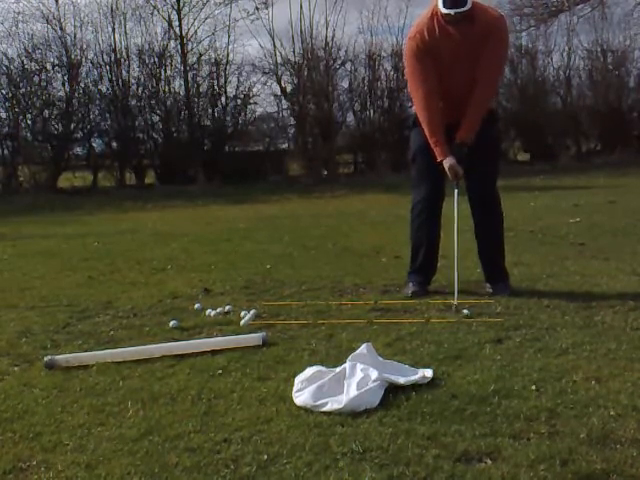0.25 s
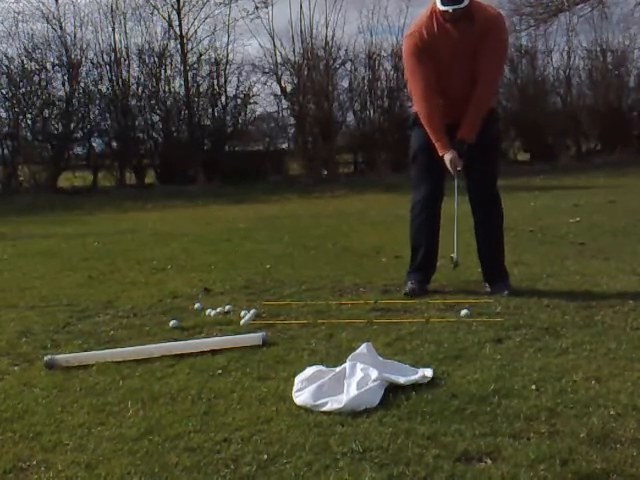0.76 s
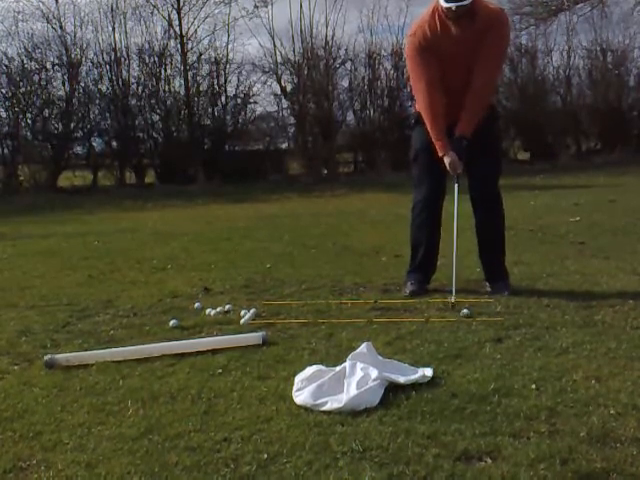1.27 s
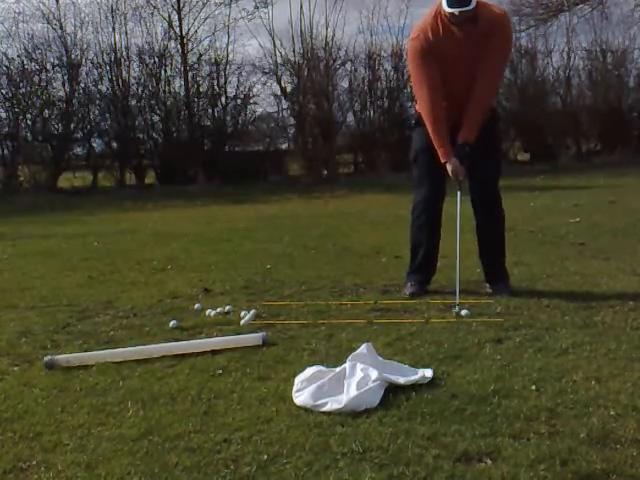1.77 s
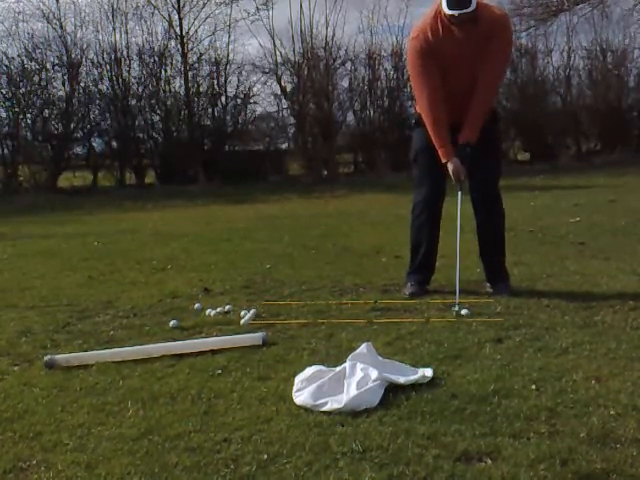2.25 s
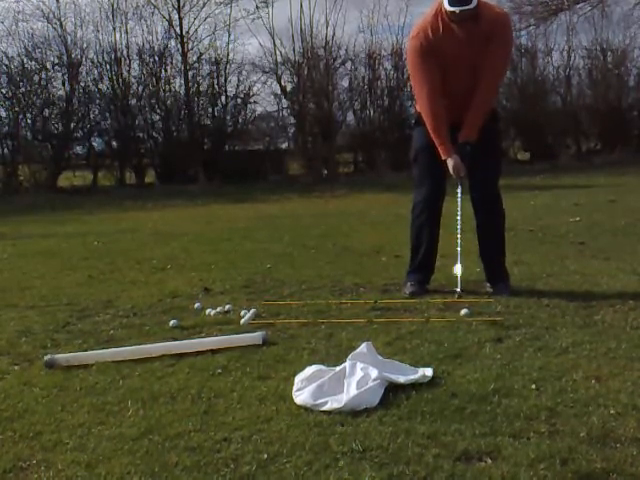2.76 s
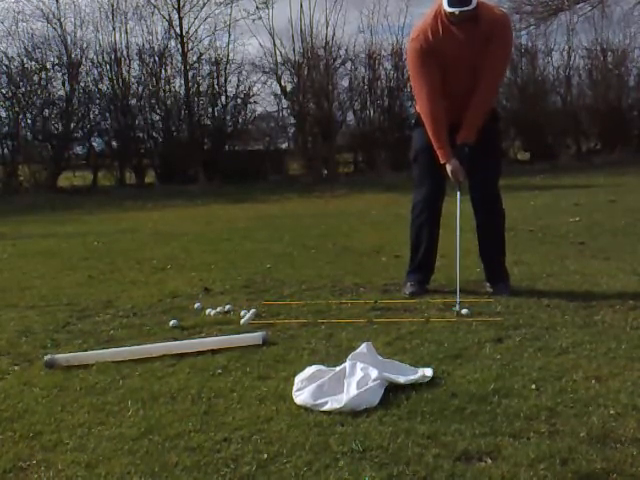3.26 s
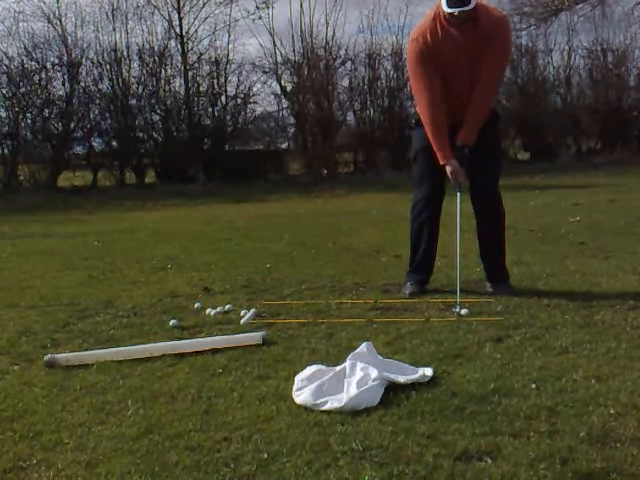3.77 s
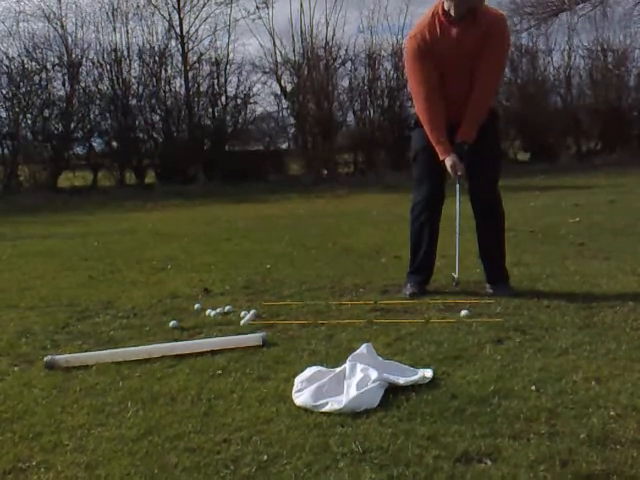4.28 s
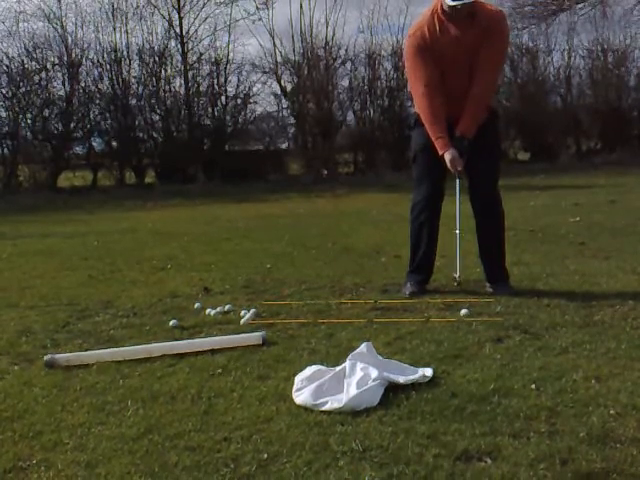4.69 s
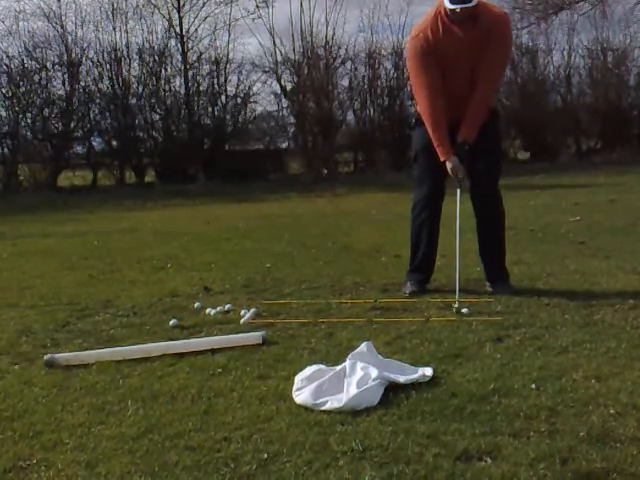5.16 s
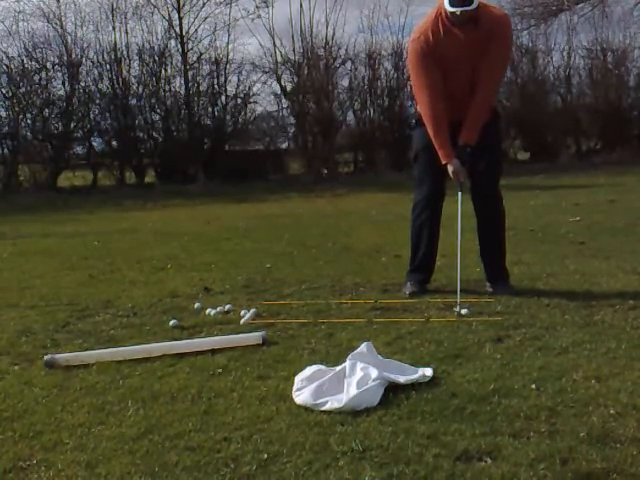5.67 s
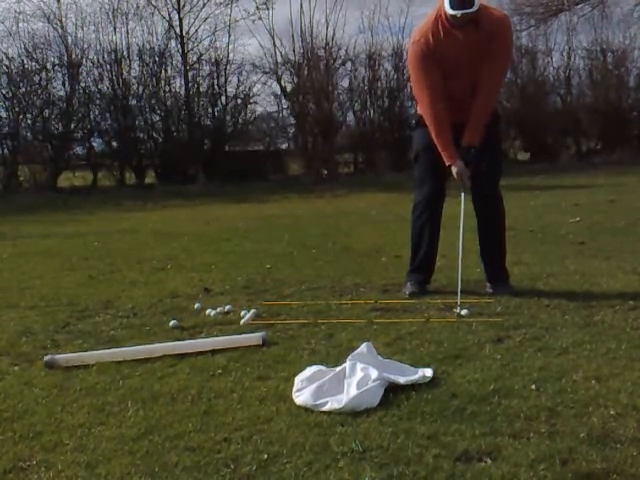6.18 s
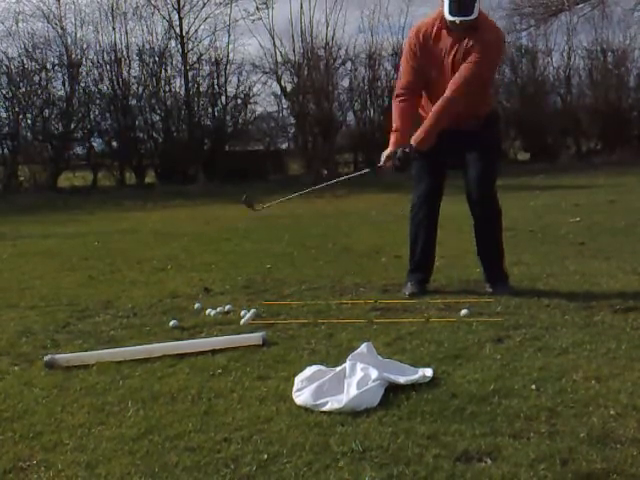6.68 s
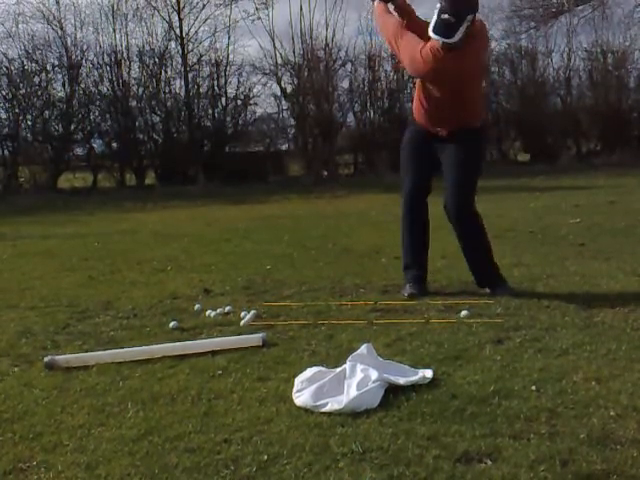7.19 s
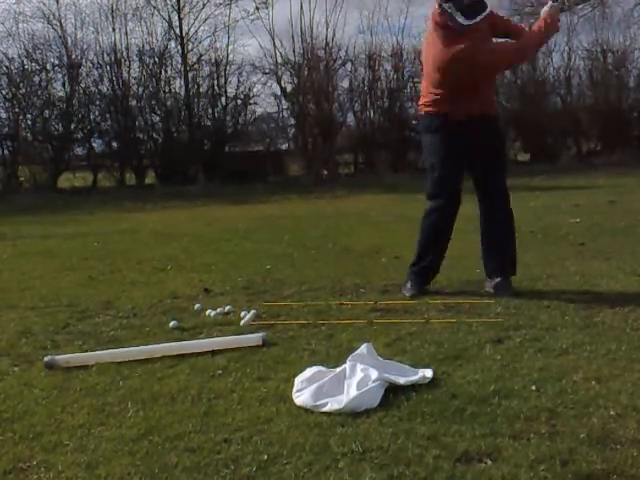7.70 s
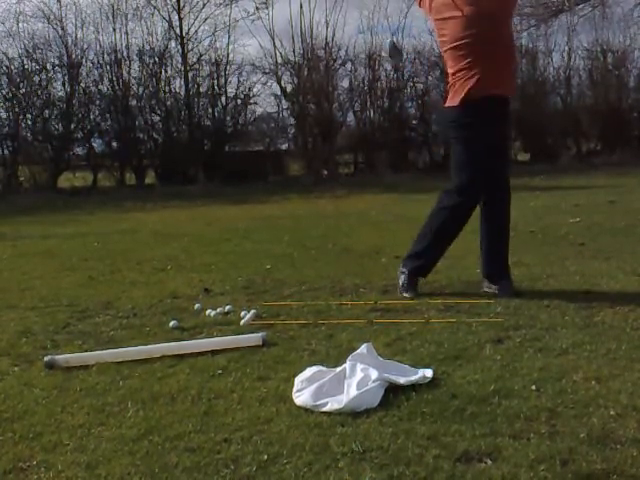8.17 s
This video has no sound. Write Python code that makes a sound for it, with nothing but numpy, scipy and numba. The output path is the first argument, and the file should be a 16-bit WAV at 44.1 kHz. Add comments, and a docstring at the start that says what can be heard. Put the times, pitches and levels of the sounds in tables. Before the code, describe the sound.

A propeller plane drones low over distant traffic outdoors, wind thuds on the microphone, then a swift whoosh and one sharp golf-ball click on turf.

```python
"""In an open field lined by a hedge, an iron strikes a golf ball off grass a few metres from the microphone.
Far traffic is coloured noise; a propeller aircraft, harmonics of a sinking firing rate with a noisy rasp.
Wind is low-passed noise with one hard buffet of separate pressure pulses; the shaft whooshes as a rising
vortex tone in a rush of air. Brief contact forces ring the modes of the head into a click; noise bursts
make the sole cutting turf and the faint, smeared echo from hedge and trees."""
import sys
import numpy as np
from scipy import signal
from scipy.fft import rfft, irfft, next_fast_len
from scipy.io import wavfile
from scipy.ndimage import uniform_filter1d
from numba import njit

SR = 44100
rng = np.random.default_rng(int(sys.argv[2]) if len(sys.argv) > 2 else 0)


def voltage_ratio(level):
    """Linear amplitude factor for a level in decibels (scalar or array-like)."""
    return 10 ** (np.asarray(level, float) / 20)


def wav_record(signal):
    """Record a signal, one row per channel, as 16-bit PCM in the file named by sys.argv[1]."""
    frames = np.transpose(np.atleast_2d(signal))
    bounded = np.clip(frames, -1, 1)
    # unit amplitude maps onto the largest positive 16-bit level
    quanta = np.round(bounded * 32767).astype(np.int16)
    wavfile.write(sys.argv[1], SR, quanta)


N = 372194
T = np.arange(N) / SR


def curve(table):
    """Linear interpolation: joins each column of a table by straight lines in time."""
    s, *columns = np.transpose(table)
    return [np.interp(T, s, c) for c in columns]


def unit(x):
    """Normalisation to an rms of 1."""
    return x / np.sqrt(np.mean(x ** 2))


def noise(colour):
    """Spectral shaping: stationary noise of rms 1 whose spectrum follows f/Hz, level/dB."""
    hz, db = np.transpose(colour)
    size = next_fast_len(N)
    f = np.arange(size // 2 + 1) * SR / size + 1  # the 1 avoids log(0)
    gain = voltage_ratio(np.interp(np.log(f), np.log(hz), db))
    spectrum = rfft(rng.standard_normal(size)) * gain
    return unit(irfft(spectrum, size)[:N])


def walk(rate):
    """Slow random modulation: levels held for 1 / rate s, smoothed twice, with rms 1."""
    k = int(SR / rate)
    held = np.repeat(rng.standard_normal(N // k + 1), k)
    return unit(uniform_filter1d(uniform_filter1d(held, k), k)[:N])


def bump(s, half):
    """Gaussian envelope: a smooth swell of height 1 around a moment."""
    return np.exp(-((T - s) / half) ** 2)


def band(x, hz, width_hz):
    """Band-pass filtering with fixed edges whose geometric mean is the centre frequency."""
    edges = np.sqrt(hz ** 2 + width_hz ** 2 / 4) + np.array([-width_hz, width_hz]) / 2
    edges = np.clip(edges, 20, .45 * SR)
    return signal.sosfilt(signal.butter(2, edges, "bandpass", fs=SR, output="sos"), x)


@njit
def lowpass(x, hz):
    """State-variable low-pass filtering: the edge may move at every sample."""
    y, b, l = np.empty(len(x)), 0., 0.
    for i in range(len(x)):
        g = np.tan(np.pi * hz[i] / SR)
        v = (b + g * (x[i] - l)) / (1 + g * (g + 1.4))
        y[i] = l + g * v
        b, l = 2 * v - b, 2 * y[i] - l
    return y


def bursts(table):
    """Transient noise: band-limited bursts with a quick rise and an exponential decay."""
    out = np.zeros(N)
    for s, db, rise, t60, hz, width_hz in table:
        t = np.arange(int((rise + t60) * SR)) / SR
        shape = np.minimum(t / rise, 1) ** 2 * voltage_ratio(-60 * np.maximum(t - rise, 0) / t60)
        grain = unit(band(rng.standard_normal(int(.4 * SR)), hz, width_hz))[-len(t):]
        start = int(s * SR)
        out[start:start + len(t)] += voltage_ratio(db) * shape * grain
    return out


# spectrum of the preamplifier's own noise: f/Hz, relative level per Hz/dB
HISS_SPECTRUM = [(1470, -38.5), (2500, -3), (3160, -6.5), (5700, -10.5), (9500, -13.5), (15100, -5),
                 (15900, -10.5), (16300, -19)]


def preamplifier_hiss():
    """Electronic self-noise: a stationary hiss of fixed spectrum."""
    return voltage_ratio(-70.5) * noise(HISS_SPECTRUM)


# far traffic: t/s, roar level/dB, tyre hiss level/dB
TRAFFIC_LEVELS = [(0.0, -44, -62.5), (1.3, -48.5, -65.5), (2.5, -46.5, -64), (3.5, -46, -63),
                  (4.8, -43.5, -62.5), (5.6, -48, -65.5), (6.6, -47.5, -66.5), (8.44, -46.5, -64)]
# spectrum of the low roar: f/Hz, relative level per Hz/dB
ROAR_SPECTRUM = [(53, -37), (90, -11.5), (129, -9.5), (205, -17.5), (252, -17.5), (372, -21), (433, -20.5),
                 (1200, -36), (1560, -60.5), (2640, -120)]
# spectrum of the tyre hiss: f/Hz, relative level per Hz/dB
TYRE_SPECTRUM = [(500, -9.5), (1000, -5), (1500, 1), (2200, -4), (3500, -14.5), (6000, -21)]


def traffic():
    """Superposition of many far sources: low roar and tyre hiss; the distant hiss stays nearly smooth."""
    roar_db, tyre_db = curve(TRAFFIC_LEVELS)
    roar = voltage_ratio(roar_db + 1.1 * walk(9.6)) * noise(ROAR_SPECTRUM)
    hiss = voltage_ratio(tyre_db + .8 * walk(16)) * noise(TYRE_SPECTRUM)
    return roar + hiss


# relative strength of the four firings of a cycle: level/dB
CYLINDER_LEVELS = [2, -5, 0.5, 0]
# swells of the rasp, and one brief tick at 7.619 s: middle t/s, half length/s, centre f/Hz, level/dB
RASP_BANDS = [(.3, .08, 1410, -62), (0.332, 0.079, 700, -53), (2.203, 0.079, 1120, -57),
              (2.27, .08, 1500, -65), (2.3, 0.18, 710, -55.5), (2.697, 0.34, 702, -54),
              (3.933, 0.22, 657, -54), (4.453, 0.14, 1047, -58), (4.52, .08, 1490, -59),
              (5.15, 0.18, 470, -54), (6.31, 0.18, 650, -55.5), (6.84, .09, 1150, -67),
              (7.619, .03, 1500, -56), (7.68, .08, 1470, -61)]


def rasp(turns):
    """Pulsed gas flow: each firing gives a pop and a decaying puff; a faint band stays, others come and go."""
    firing = turns.astype(int)
    cycle_db = np.array(CYLINDER_LEVELS)[firing % len(CYLINDER_LEVELS)]
    size_db = cycle_db + 1.5 * rng.standard_normal(N // 200)[firing]
    pops = np.diff(firing, prepend=0)
    gas = np.exp(-(turns % 1) / 0.6) * rng.standard_normal(N)
    puffs = voltage_ratio(size_db) * (gas + 12.7 * pops)
    out = voltage_ratio(-65 + 2.5 * walk(5.6)) * unit(band(puffs, 760.0, 830.0))
    for s, half, hz, db in RASP_BANDS:
        out = out + voltage_ratio(db) * bump(s, half) * unit(band(puffs, hz, 260))
    return out


# aircraft: t/s, fundamental level/dB, second harmonic level/dB
PLANE_LEVELS = [(0.0, -32.5, -48), (1.1, -33.5, -57.5), (1.8, -38.5, -54), (2.3, -37, -49.5),
                (3.1, -38, -51.5), (3.8, -35.5, -56.5), (4.4, -35.5, -50.5), (4.85, -33.5, -45),
                (5.6, -36.5, -49), (6.4, -36, -43), (7.0, -36.5, -49), (7.8, -38, -43.5),
                (8.44, -39.5, -46.5)]
# usual strength of harmonics 3 to 6: level/dB
OVERTONE_LEVELS = [-62.5, -63.5, -66, -67.5]
# swells of harmonics 3 to 6, one list per harmonic, often overlapping: middle t/s, half length/s, level/dB
HARMONIC_SWELLS = [
    [(.9, 0.33, -54.5), (2.4, 0.47, -50.5), (3.55, 0.29, -59), (4.8, 0.45, -52.5), (8.1, 0.38, -56.5)],
    [(.15, 0.19, -50.5), (.95, 0.22, -52.5), (1.65, 0.12, -54), (2.2, 0.19, -56), (3.6, .35, -53),
     (4.9, 0.51, -48.5)],
    [(1.65, 0.2, -58), (2.3, 0.25, -54.5), (3.6, .3, -57), (5.2, 0.31, -55), (6.55, 0.32, -57.5)],
    [(.4, 0.26, -64), (2.4, 0.31, -62), (3.9, 0.28, -57.5), (5.2, 0.55, -59.5)],
]


def plane():
    """Fourier synthesis: wavering harmonics of the firing rate, a half order and rasp; pitch sinks in passing."""
    firing_hz, sink_hz_per_s = 84.53, .74  # rate at the start and its fall
    fade_db = 3.5  # rms depth to which moving air varies harmonics 3 to 6
    turns = np.cumsum(firing_hz - sink_hz_per_s * T + 0.304 * walk(2.5)) / SR
    gains = [voltage_ratio(db) for db in curve(PLANE_LEVELS)]
    for usual_db, swells in zip(OVERTONE_LEVELS, HARMONIC_SWELLS):
        swell = sum(voltage_ratio(db) * bump(s, half) for s, half, db in swells)
        gains.append(voltage_ratio(usual_db + fade_db * walk(2.99)) + swell)
    half_order = np.sin(np.pi * turns + 0.47 * walk(4))
    out = gains[0] * voltage_ratio(-15.5 + 1.5 * walk(6.5)) * half_order
    for k, gain in enumerate(gains, 1):
        phase = 2 * np.pi * k * turns + .3 * np.sqrt(k) * walk(7)
        out = out + np.sqrt(2) * gain * voltage_ratio(1.21 * walk(9)) * np.sin(phase)
    return out + rasp(turns)


# light breeze on the microphone: t/s, level/dB before random wavering
BREEZE_LEVELS = [(0.0, -44), (1.0, -47), (1.9, -53), (3.9, -55.5), (4.5, -42), (5.9, -56), (7.0, -44.5),
                 (7.5, -40.5), (8.15, -50), (8.44, -44)]
# gusts above the breeze: peak t/s, level/dB, rise/(dB/s), fall/(dB/s)
GUST_PEAKS = [(1.41, -38.5, 150, 150), (1.61, -42, 200, 100), (4.19, -22, 190, 77.5), (4.63, -36, 120, 78),
              (4.9, -40.5, 200, 60), (7.23, -35, 91, 120), (7.57, -36.5, 120, 88), (8.02, -37.5, 120, 92)]


def wind():
    """Turbulent pressure: a stronger gust sheds faster eddies, so the noise's edge climbs and flutter joins in."""
    db = curve(BREEZE_LEVELS)[0] + 2.25 * walk(6)
    for s, peak_db, rise, fall in GUST_PEAKS:
        away_db = np.where(T < s, rise * (s - T), fall * (T - s))
        db = np.maximum(db, peak_db - away_db)
    edge_hz = np.clip(62.3 * voltage_ratio(0.4 * (db + 49.5)), 30, 1000)
    rumble = noise([(10, -19), (25, -5), (60, 0.5), (20000, -2.0)]) * voltage_ratio(2.5 * walk(40))
    rumble = lowpass(lowpass(rumble, edge_hz), 1.6 * edge_hz)
    flutter = unit(band(band(rng.standard_normal(N), 510.0, 600.), 670.0, 600.))
    flutter = voltage_ratio(-45.5 + 3.9 * (db + 22.5) + 2.7 * walk(70)) * flutter
    return voltage_ratio(db) * rumble * np.sqrt(SR / 2 / 55.0) + flutter


# the strongest eddies that knock the membrane: middle t/s, level/dB of the sine before its envelope, f/Hz
EDDY_KNOCKS = [(4.171, -9, 148), (4.201, -3, 144), (4.223, -11, 96.5), (4.260, -9.5, 130), (7.179, -22, 90),
               (7.237, -15.5, 78)]


def eddies():
    """Pressure pulse: each eddy pushes the membrane out and pulls it back; the steep middle adds an overtone."""
    out = np.zeros(N)
    for s, db, hz in EDDY_KNOCKS:
        near = slice(int((s - 2 / hz) * SR), int((s + 2 / hz) * SR))
        turn = (T[near] - s) * hz
        push = np.sin(2 * np.pi * turn) * np.exp(-(turn / 0.36) ** 2)
        steep = voltage_ratio(-20) * np.sin(2 * np.pi * 3.3 * turn) * np.exp(-(turn / 0.24) ** 2)
        out[near] -= voltage_ratio(db) * (push + steep)
    return out


# returns from hedge and trees: t/s, level/dB, rise/s, t60/s, centre f/Hz, width/Hz
HEDGE_RETURNS = [(7.93, -51, .008, 0.078, 1800, 2000), (7.957, -52, 0.0086, 0.11, 4320, 1800),
                 (7.957, -50, 0.0088, .15, 2660, 1000), (7.995, -54, 0.018, .25, 2270, 1300),
                 (8.075, -63, .015, 0.33, 3020, 2800)]


def hedge_echo():
    """Diffuse reflection: the blow comes back from hedge and trees as smeared noise."""
    return bursts(HEDGE_RETURNS)


# sole in the turf, tearing and thud: t/s, level/dB, rise/s, t60/s, centre f/Hz, width/Hz
TURF_BURSTS = [(7.8800, -27.5, 0.0037, 0.013, 3200, 6500), (7.8860, -23.5, .002, 0.027, 4000, 4000),
               (7.8845, -24.5, 0.00088, 0.022, 11300, 4300), (7.8862, -16, 0.00299, .025, 500, 206),
               (7.8920, -40.5, 0.0018, 0.14, 990, 2200), (7.8940, -23.5, .003, .025, 230, 302),
               (7.8830, -22, .003, .025, 1400, 1350)]


def turf():
    """Fracture and damped impact: the sole tears grass and thuds into the soil as short noise bursts."""
    return bursts(TURF_BURSTS)


# spectrum of the broad rush of air: f/Hz, relative level per Hz/dB
RUSH_SPECTRUM = [(400, 4), (900, 1.5), (1600, -2), (3200, -10.5), (5500, -21), (8000, -52), (12000, -39)]


def swing():
    """Vortex shedding: the tone's pitch and level follow the shaft's speed, inside a broad rush of air."""
    impact_s, vortex_hz = 7.885, 629  # the blow, and the nominal pitch reached there
    gain_hz_per_s, brake_hz_per_s = 3000, 9000  # climb until the blow, drop after it
    away_hz = np.where(T < impact_s, gain_hz_per_s * (impact_s - T), brake_hz_per_s * (T - impact_s))
    hz = np.maximum(vortex_hz - away_hz, 100)
    tone_db = -30 + 21 * np.log2(hz / vortex_hz)  # a faster shaft is louder: 21 dB per octave
    phase = 2 * np.pi * np.cumsum(hz * (1 + 0.04 * walk(250))) / SR
    tone = np.sqrt(2) * voltage_ratio(tone_db + 3.04 * walk(150)) * np.sin(phase)
    # vortices lock into a tone as the shaft gets fast, fully by 7.856 s
    locked = np.clip((T - 7.856) / 0.018 + 1, 0, 1) ** 2
    locked = locked * voltage_ratio(-60 * np.maximum(T - impact_s, 0) / .04)
    air = rng.standard_normal(N)
    ridge_hz = np.clip(1700 * (hz / vortex_hz) ** 3.0, 200, 4000)  # the head's wake brightens with speed
    ridge = lowpass(air, 1.2 * ridge_hz) - lowpass(air, .8 * ridge_hz)
    ridge = ridge * np.sqrt(SR / 2 / ridge_hz)
    sweep = voltage_ratio(-39.5 + 1.8 * walk(300)) * bump(7.868, 0.032)  # the shaft sweeps nearest
    return locked * tone + sweep * (noise(RUSH_SPECTRUM) + voltage_ratio(-7) * ridge)


# modes of club head and ball: f/Hz, relative level/dB, t60/s
HEAD_MODES = [(1070, -6, 0.011), (1720, -0.5, 0.0083), (2180, 0, 0.0058), (3190, 2, 0.012),
              (4315, -5, .006), (5510, 2, 0.0056), (6620, -17.5, 0.012), (11800, -15, .004)]
# contacts of the head, ball then turf: t/s, relative level/dB, contact time/s
HEAD_CONTACTS = [(7.8848, -12, .00012), (7.88525, -5, .00016), (7.8872, -16, .00014), (7.8889, -10, .00016),
                 (7.8904, -15, .0001)]


def strike():
    """Modal excitation: half-sine forces ring the head's modes; a longer contact rings fewer high ones."""
    t = np.arange(int(.04 * SR)) / SR
    ring = 0
    for k, (hz, db, t60) in enumerate(HEAD_MODES):
        sense = (-1) ** k  # neighbouring modes move the face in opposite senses
        ring = ring + sense * voltage_ratio(db - 60 * t / t60) * np.sin(2 * np.pi * hz * t)
    start = int(HEAD_CONTACTS[0][0] * SR) - 100
    now = (start + np.arange(600)) / SR
    force = 0
    for s, db, contact in HEAD_CONTACTS:
        push = np.sin(np.pi * np.clip((now - s) / contact, 0, 1))
        force = force + voltage_ratio(db) * push / push.sum()
    heard = band(np.convolve(force, ring), 2700.0, 14000.)  # so small a body radiates no bass
    out = np.zeros(N)
    out[start:start + len(heard)] = 0.88 * heard
    return out


def scene():
    """Linear superposition of all sources at one microphone."""
    background = traffic() + plane() + wind() + eddies()
    return (background + hedge_echo() + turf() + swing() + strike())[None]


def gain_control(sound):
    """Dynamic compression: gain falls as the smoothed power rises and recovers slowly after loud wind."""
    hold = np.exp(-1 / (.15 * SR))  # two smoothing stages of 0.15 s
    power = signal.lfilter([(1 - hold) ** 2], [1, -2 * hold, hold ** 2], sound ** 2)
    return sound * (1 + power / voltage_ratio(-43.0)) ** -.2


def top_cut(x):
    """Nothing passes above the cut-off."""
    return signal.sosfilt(signal.butter(12, 16480, fs=SR, output="sos"), x)


def record(dry):
    """Signal chain: the preamplifier adds hiss and cuts the top, then the gain control acts."""
    top = signal.ellip(8, .2, 60, 15800, fs=SR, output="sos")
    sound = signal.sosfilt(top, dry + preamplifier_hiss())
    finished = gain_control(sound)
    return top_cut(finished)


dry = scene()
out = record(dry)
wav_record(out)
```